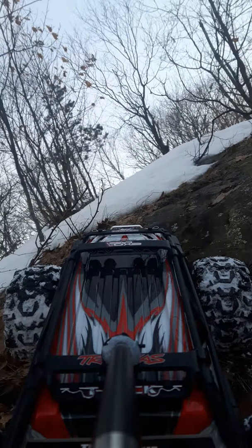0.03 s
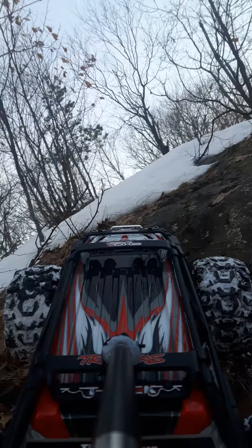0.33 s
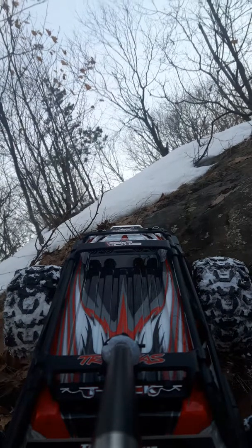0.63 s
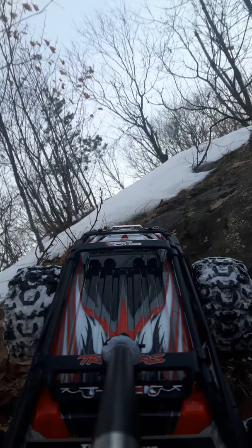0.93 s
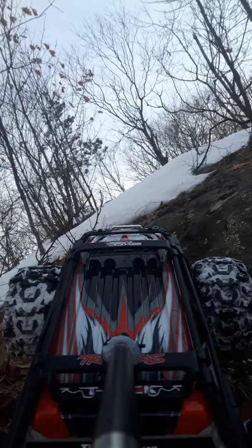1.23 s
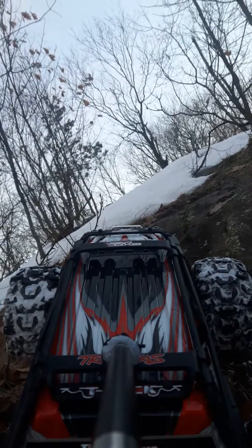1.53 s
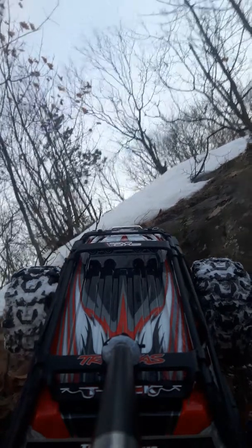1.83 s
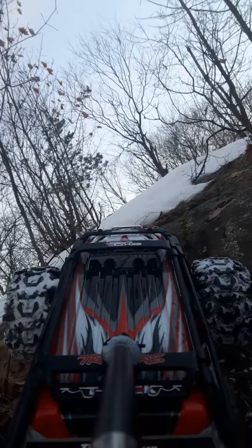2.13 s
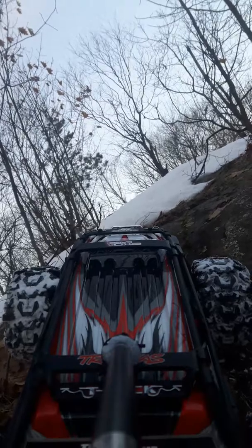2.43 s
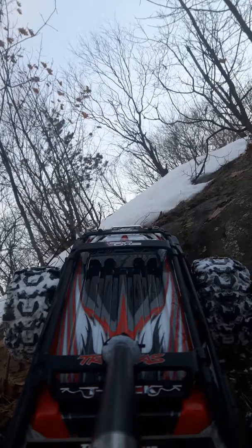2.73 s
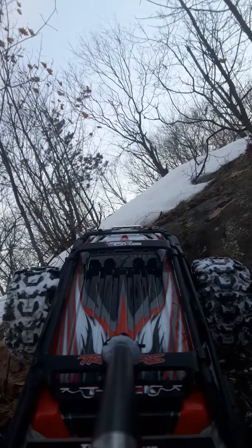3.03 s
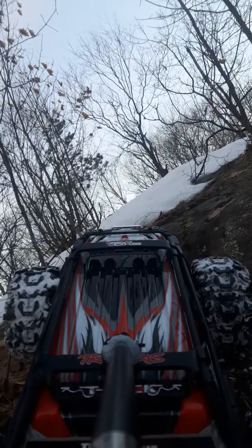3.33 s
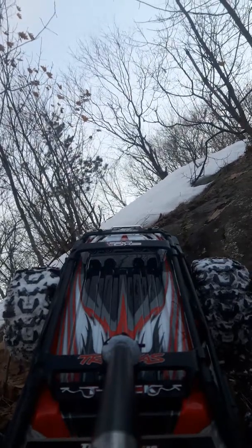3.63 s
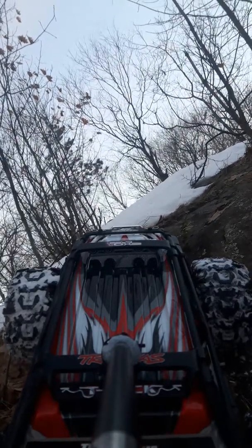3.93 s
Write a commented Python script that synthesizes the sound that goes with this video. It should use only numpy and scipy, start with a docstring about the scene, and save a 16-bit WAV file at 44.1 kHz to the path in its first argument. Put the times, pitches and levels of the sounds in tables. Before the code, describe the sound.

Small tyres crunch over snow and dead leaves, heard close from on board a slow electric model crawler. The strongest surges come at about 0.1, 1.4, 2 and 2.6 seconds, with lighter crunches between, icy snaps, twig cracks and a few chassis knocks. A thin motor whine holds one pitch throughout over a faint gear whirr. After about 2.8 seconds the crunching fades, leaving mostly the whine.

```python
"""Tyres crush snow and dead leaves in surges as a small electric crawler climbs slowly, heard from on board.
Each surge is a shower of tiny fractures that rumble through the frame, crunch, and hiss in the housing,
with single ice crystals crackling on top. The motor drive whines at a steady pitch over a faint hum and
gear whirr. Now and then the chassis bumps, the icy crust snaps or a twig cracks."""
import sys
import numpy as np
from scipy import signal
from scipy.fft import rfft, irfft
from scipy.io import wavfile

SR = 44100
rng = np.random.default_rng(int(sys.argv[2]) if len(sys.argv) > 2 else 0)


def to_wav(sig):
    """Store sig (one row per channel, or 1-D mono) as 16-bit WAV at the path in sys.argv[1].

    Samples outside -1..1 are clipped; the rate is SR.
    """
    pcm = np.clip(np.atleast_2d(sig), -1, 1) * 32767
    pcm = np.round(pcm).astype(np.int16)
    wavfile.write(sys.argv[1], SR, pcm.T)  # frames by channels


N = 176400
TIME = np.arange(N) / SR

# how hard the tyres crush the snow: t/s, rumble level/dB, crunch level/dB, hiss level/dB
CRUSH_ENVELOPES = [(0.0, -46.5, -48.5, -48), (0.06, -49, -39.5, -48), (0.075, -47, -39.5, -37.5),
                   (0.095, -41, -34, -39.5), (0.11, -27, -23, -35), (0.135, -36.5, -37, -40),
                   (0.17, -30.5, -32.5, -37.5), (0.21, -43, -33, -40), (0.26, -44, -43.5, -53),
                   (0.29, -40.5, -42.5, -48), (0.335, -52.5, -52.5, -52), (0.39, -53, -46, -55),
                   (0.42, -52, -47, -53), (0.45, -53, -53, -54), (0.47, -56, -58, -60.5),
                   (0.552, -52, -57, -68), (0.564, -37.5, -43, -46.5), (0.602, -63, -44.5, -46.5),
                   (0.612, -49, -55, -58.5), (0.7, -50, -49, -60.5), (0.759, -54, -48, -60),
                   (0.772, -46, -39, -46.5), (0.81, -30.5, -45, -48), (0.83, -39.5, -47.5, -59),
                   (0.87, -48, -50.5, -59.5), (0.945, -42.5, -37, -51.5), (0.97, -45.5, -40, -54.5),
                   (1.07, -39, -44.5, -50.5), (1.105, -44.5, -40, -41), (1.15, -57, -55, -58),
                   (1.305, -55.5, -54, -66.5), (1.318, -54, -52, -50.5), (1.395, -35.5, -37, -39.5),
                   (1.425, -37.5, -31.5, -39.5), (1.48, -47, -37.5, -45), (1.55, -43.5, -42.5, -48.5),
                   (1.62, -47, -39, -50.5), (1.69, -56, -56, -61), (1.755, -52, -54, -67),
                   (1.8, -39.5, -37.5, -53), (1.915, -47.5, -35.5, -48), (1.93, -36, -35.5, -38),
                   (1.98, -34.5, -28, -38.5), (2.01, -38, -35, -43.5), (2.04, -41, -43.5, -57),
                   (2.09, -43, -43.5, -52.5), (2.14, -38.5, -43, -51), (2.18, -49, -44, -56.5),
                   (2.25, -47, -44, -51.5), (2.3, -53, -57.0, -63.5), (2.585, -54, -57.5, -74),
                   (2.601, -30.5, -27.5, -38.5), (2.625, -40, -42.5, -52.5), (2.65, -27, -38.5, -45.5),
                   (2.69, -32, -44, -52.0), (2.73, -47.5, -44.5, -52.5), (2.87, -47.5, -50.5, -57),
                   (2.94, -44, -48.5, -60), (3.12, -45.5, -47.5, -66), (3.3, -56, -61, -74),
                   (3.6, -52.5, -57, -80), (4.0, -54, -56, -78)]
# send from the hiss grains to a rasp near 4.4 kHz: t/s, level/dB
RASP_SEND = [(0, -16), (.8, -11.5), (1.05, -10.5), (1.33, -10), (1.5, -6), (1.95, -16.5), (2.22, -9),
             (2.58, -16.5), (2.8, -8), (4, -20)]
# tone of each snow layer on its way through frame and housing: f/Hz, level/dB
RUMBLE_EQ = [(30, -44.5), (70, -16), (120, -1), (185, 1), (260, 0.5), (350, -2), (480, -8), (900, -45.5)]
CRUNCH_EQ = [(50, -29.5), (150, -19.5), (380, -2), (500, -0.5), (600, 2), (800, -1), (1200, -7.5),
             (1800, -9.5), (2600, -20), (3600, -21), (8000, -44)]
HISS_EQ = [(100, -42), (1500, -10), (3000, -14), (4400, -15.5), (5300, -10.5), (6200, -11), (6900, -4),
           (7400, -11.5), (8350, 1.5), (9100, -5.5), (10200, -13.5), (12500, -16), (14000, -12.5),
           (15700, -8.5)]
RASP_EQ = [(2500, -26), (3700, -12.5), (4400, 0), (5300, -7.5), (7000, -26.5)]
# whine partials 1 to 5 swell and fade as the load shifts, one curve each: t/s, level/dB
WHINE_ENVELOPES = [
    [(0, -57), (.13, -54), (.22, -51), (.42, -53), (.7, -49.5), (.78, -54.5), (.95, -48.3), (1.16, -56.5),
     (1.36, -51), (1.72, -54.5), (1.96, -45.5), (2.04, -52), (2.3, -47), (2.44, -49.5), (2.75, -47),
     (3.47, -46.5), (3.7, -52.5)],
    [(0, -72), (.3, -69.5), (.8, -59), (1.55, -58), (1.7, -66), (1.88, -60), (2.6, -63.5), (3.2, -60),
     (4, -62)],
    [(.9, -83), (1.45, -74), (1.75, -81), (2.02, -66.5), (3.4, -65), (4, -66)],
    [(.15, -65), (.36, -63), (1.35, -62), (1.6, -67), (1.92, -70), (2.08, -61), (2.48, -64), (2.55, -76),
     (2.66, -72), (2.8, -62), (2.97, -78), (3.17, -64), (3.8, -61.5), (4, -65)],
    [(.85, -79), (1.2, -65.5), (1.65, -75), (2.35, -67), (3, -68.5), (3.49, -68.5), (3.56, -81), (3.7, -73),
     (3.87, -65), (3.94, -77)],
]
# whine partials 6 to 9, against the second: level/dB
WHINE_OVERTONES = [-20.5, -20.5, -30, -29]
# the whine stutters when the motor strains: t/s, depth/dB
STUTTER_DEPTH = [(.6, 1.4), (.68, 2.6), (.78, 1.4), (3.48, 0.33), (3.63, 2.0), (3.76, 1.7)]
# hum of the rotor: harmonic number, level/dB
HUM_HARMONICS = [(1, -63.5), (2, -70.5), (5, -72)]
# tone of the gear whirr: f/Hz, level/dB
GEAR_EQ = [(25, -9.5), (60, 1), (130, 3.5), (250, -2), (420, -15), (600, -12), (1000, -11), (2000, -24),
           (3000, -30.5), (6000, -44), (15000, -74)]
# the chassis bumps over roots and stones: t/s, level/dB, rattle decay/s
BUMP_HITS = [(0.1003, -11.5, 0.022), (0.1327, -33, 0.01), (0.560, -41, 0.015), (0.813, -29, 0.013),
             (1.974, -21, 0.0053), (2.6, -23, 0.0087), (2.643, -27.5, 0.054), (2.690, -25, 0.014)]
# resonances of the chassis: f/Hz, level/dB, t60/s
CHASSIS_MODES = [(125, -27, 0.036), (190, 1, 0.092), (256, -4.5, 0.0283), (340, 0.5, 0.029),
                 (417, -4, 0.035), (580, -3.5, 0.053), (830, -1.5, 0.018), (1030, -5.5, 0.024),
                 (1370, -3, 0.0065)]
# the icy crust snaps: t/s, level/dB, decay/s
CRUST_HITS = [(0.102, -17, 0.0033), (0.107, -8.5, 0.0035), (0.1232, -28, .002), (0.398, -28, 0.0032),
              (0.445, -33, 0.0036), (0.571, -22.5, 0.0025), (0.598, -35, 0.0023), (1.3878, -8, 0.0012),
              (1.4172, -12.5, 0.0026), (2.023, -24, 0.0029), (2.618, -33, 0.0026), (3.693, -49, .003),
              (3.716, -50, .003), (3.826, -50, .002)]
# twigs and dry leaves crack under the tyres: t/s, level/dB, f/Hz, t60/s
TWIG_HITS = [(0.286, -36.5, 728, 0.083), (0.3132, -24.5, 2500, 0.0018), (0.3282, -30.5, 2500, 0.002),
             (0.360, -32, 950, 0.011), (0.383, -30, 580, 0.019), (0.555, -31.5, 610, 0.017),
             (0.591, -25, 1310, 0.002), (0.941, -31.5, 1160, 0.022), (1.4217, -22, 1230, 0.0056)]
# tone of the faint stereo noise floor: f/Hz, level/dB
NOISE_FLOOR_EQ = [(30, -27), (200, -6), (1700, -5.5), (4000, -13), (15000, -25)]


def from_db(db):
    """Decibels to gain."""
    return 10 ** (np.asarray(db) / 20)


def unit_power(x):
    """Scale to an RMS of 1."""
    return x / np.sqrt(np.mean(x ** 2) + 1e-20)


def envelopes(rows):
    """Join timed breakpoints into one envelope per column."""
    times, *columns = np.transpose(rows)
    return [np.interp(TIME, times, column) for column in columns]


def drift(rate_hz):
    """Slow random modulator with a spread of 1."""
    hop, run_in = 40, 2000
    pole = np.exp(-2 * np.pi * rate_hz * hop / SR)
    noise = rng.standard_normal(N // hop + run_in + 2)
    slow = signal.lfilter([1], [1, -2 * pole, pole * pole], noise)[run_in:]
    return np.interp(np.arange(N) / hop, np.arange(len(slow)), unit_power(slow))


def eq(x, curve, size=4096):
    """Minimum-phase EQ, so nothing rings ahead of a click; white noise keeps its power."""
    hz, db = np.transpose(curve)
    bins_hz = np.linspace(1, SR / 2, size // 2 + 1)
    gain = unit_power(from_db(np.interp(np.log(bins_hz), np.log(hz), db)))
    cepstrum = irfft(np.log(gain))
    cepstrum[1:size // 2] *= 2
    cepstrum[size // 2 + 1:] = 0
    impulse = irfft(np.exp(rfft(cepstrum)))
    return signal.fftconvolve(x, impulse)[:N]


def ring(clicks, hz, t60):
    """Each click strikes a dying sine of its own height."""
    pole = from_db(-60 / (t60 * SR))
    step = 2 * np.pi * hz / SR
    return signal.lfilter([0, np.sin(step)], [1, -2 * pole * np.cos(step), pole * pole], clicks + 1e-18)


def fractures(per_s, spread_db, clump_db, clump_hz):
    """A shower of random clicks that swells in clumps, at unit power."""
    sizes = from_db(spread_db * np.minimum(rng.exponential(1, N), 3)) * rng.choice([-1, 1], N)
    breaks = rng.random(N) < per_s / SR
    return unit_power(sizes * breaks * from_db(clump_db * drift(clump_hz)))


def tyre_crush(rumble_trim_db=-4.5, crunch_trim_db=-4, hiss_trim_db=0.5):
    """Snow gives way under the tread: coarse grains rumble, medium crunch, fine ones hiss and rasp."""
    rumble_db, crunch_db, hiss_db = envelopes(CRUSH_ENVELOPES)
    rasp_db, = envelopes(RASP_SEND)
    coarse = fractures(per_s=1500, spread_db=0, clump_db=1, clump_hz=23)
    medium = fractures(per_s=2500, spread_db=1, clump_db=2, clump_hz=33)
    fine = fractures(per_s=9000, spread_db=3.5, clump_db=1.83, clump_hz=24)
    fine *= from_db(hiss_db + hiss_trim_db)
    rumble = eq(coarse * from_db(rumble_db + rumble_trim_db), RUMBLE_EQ)
    crunch = eq(medium * from_db(crunch_db + crunch_trim_db), CRUNCH_EQ)
    hiss = eq(fine, HISS_EQ)
    rasp = eq(fine * from_db(rasp_db), RASP_EQ)
    return rumble + crunch + hiss + rasp


def drive_whine(pitch_hz=1703, waver_hz=0.5):
    """The drive's switching sings in the motor windings and stutters under strain."""
    levels = [envelopes(partial)[0] for partial in WHINE_ENVELOPES]
    levels += [levels[1] + db for db in WHINE_OVERTONES]
    stutter_db = envelopes(STUTTER_DEPTH)[0] * drift(32)
    phase = 2 * np.pi * np.cumsum(pitch_hz + waver_hz * drift(4.5)) / SR
    return np.sqrt(2) * sum(from_db(db + stutter_db) * np.sin(k * phase + rng.uniform(0, 2 * np.pi))
                            for k, db in enumerate(levels, 1))


def rotor_and_gears(turn_hz=118.6, waver=0.01268, flutter_db=3, gear_db=-59.5):
    """The turning rotor hums with a slight flutter over the low whirr of the gears."""
    angle = 2 * np.pi * np.cumsum(turn_hz * (1 + waver * drift(6.1))) / SR
    hum = sum(from_db(db + flutter_db * drift(8.1)) * np.sin(k * angle) for k, db in HUM_HARMONICS)
    whirr = from_db(gear_db) * eq(rng.standard_normal(N), GEAR_EQ)
    return np.sqrt(2) * hum + whirr


def ice_crackle(trim_db=-24.5, follow=0.8, low_hz=3800, high_hz=11500, ring_cycles=3.5):
    """Single crystals crack as bright ticks at scattered pitches, riding the hiss envelope."""
    hiss_db = envelopes(CRUSH_ENVELOPES)[-1]
    cracks = fractures(per_s=60, spread_db=3.5, clump_db=2, clump_hz=20)
    cracks *= from_db(trim_db + follow * hiss_db)
    pitches = np.geomspace(low_hz, high_hz, 10)
    choice = rng.integers(0, len(pitches), N)
    return sum(ring(cracks * (choice == k), hz, ring_cycles / hz) for k, hz in enumerate(pitches))


def chassis_bumps(rattle_per_s=540, rattle_gain=0.19, low_cut_hz=127):
    """A knock and a short rattle set the chassis ringing; the soft tyres swallow the low end."""
    clicks = np.zeros(N)
    rattle = rattle_gain * rng.standard_normal(N) * (rng.random(N) < rattle_per_s / SR)
    for t, db, decay in BUMP_HITS:
        start = int(t * SR)
        clicks[start] -= from_db(db)
        clicks[start:] += from_db(db) * rattle[start:] * np.exp(-TIME[:N - start] / decay)
    body = sum(from_db(db) * ring(clicks, hz, t60) for hz, db, t60 in CHASSIS_MODES) / 2.9
    return signal.sosfilt(signal.butter(3, low_cut_hz, "high", fs=SR, output="sos"), body)


def crust_snaps(high_cut_hz=13000):
    """The crust breaks in tight bursts of fine fractures that ring in the housing, dulled by snow."""
    force = np.zeros(N)
    for t, db, decay in CRUST_HITS:
        start = int(t * SR)
        force[start:] += from_db(db) * np.exp(-TIME[:N - start] / decay)
    bursts = eq(0.29 * force * rng.choice([-1, 1], N), HISS_EQ)
    return signal.sosfilt(signal.butter(2, high_cut_hz, fs=SR, output="sos"), bursts)


def twig_cracks(high_cut_hz=3080):
    """Each twig or leaf breaks with a click and rings briefly at its own pitch, muffled by snow."""
    cracks = np.zeros(N)
    for t, db, hz, t60 in TWIG_HITS:
        click = from_db(db) * signal.unit_impulse(N, int(t * SR))
        cracks += ring(click, hz, t60)
    return signal.sosfilt(signal.butter(4, high_cut_hz, fs=SR, output="sos"), cracks)


def scene(floor_db=-81.5):
    """The crawler sits dead centre over a faint, wide stereo noise floor."""
    noise_floor = np.array([eq(noise, NOISE_FLOOR_EQ) for noise in rng.standard_normal((2, N))])
    ground = tyre_crush() + chassis_bumps() + crust_snaps() + twig_cracks()
    motor = drive_whine() + rotor_and_gears()
    return ground + motor + ice_crackle() + from_db(floor_db) * noise_floor


def record(dry, high_cut_hz=15800):
    """A steep high cut on the whole mix."""
    lowpass = signal.firwin(401, high_cut_hz, fs=SR, window="blackman")
    return signal.fftconvolve(dry, lowpass[None], mode="same", axes=1)


dry = scene()
out = record(dry)
to_wav(out)
```